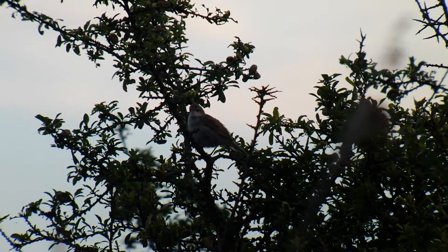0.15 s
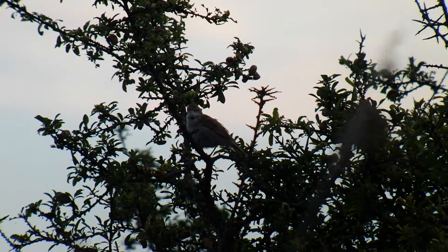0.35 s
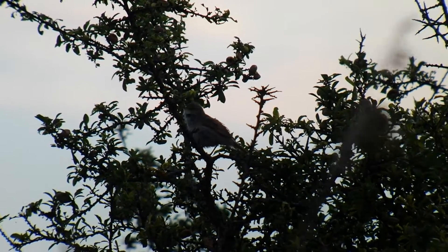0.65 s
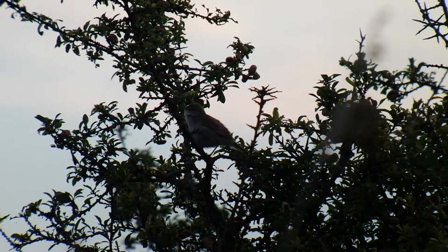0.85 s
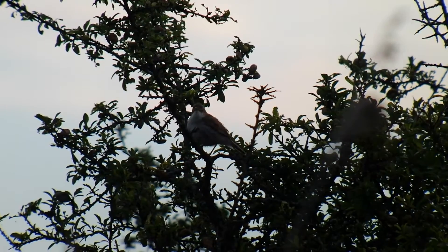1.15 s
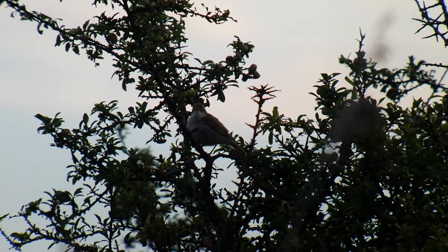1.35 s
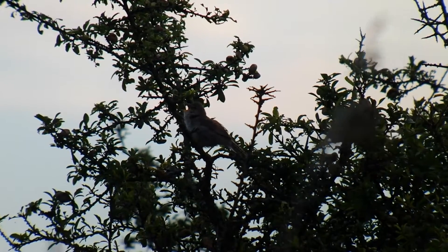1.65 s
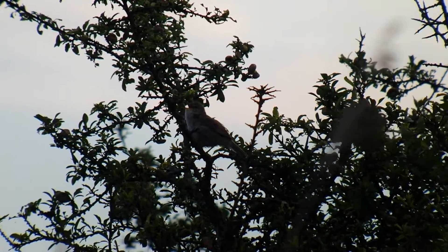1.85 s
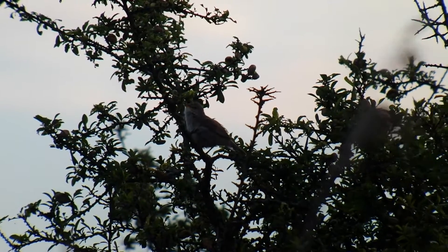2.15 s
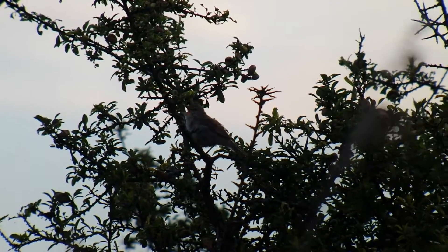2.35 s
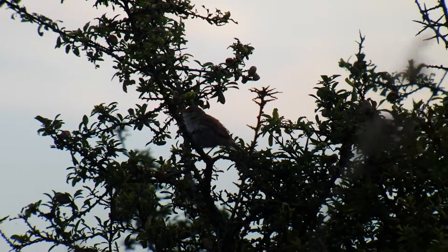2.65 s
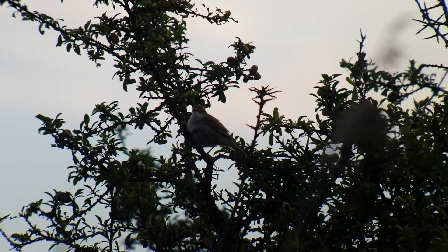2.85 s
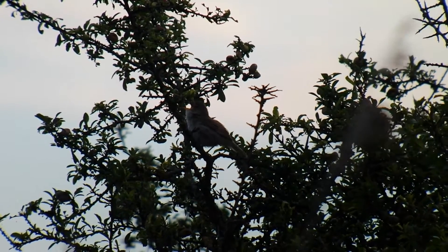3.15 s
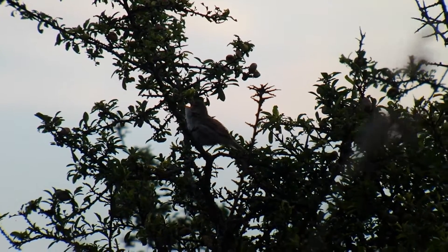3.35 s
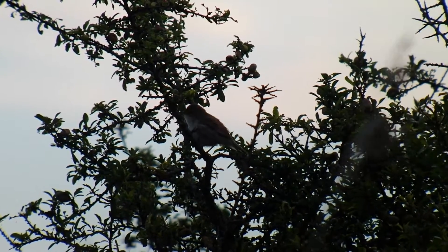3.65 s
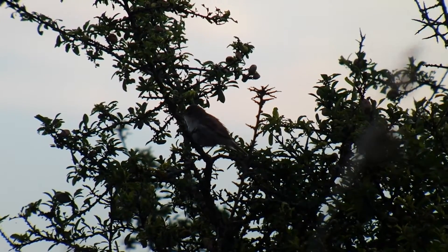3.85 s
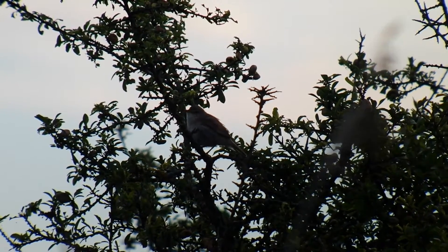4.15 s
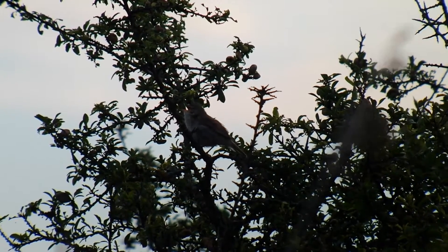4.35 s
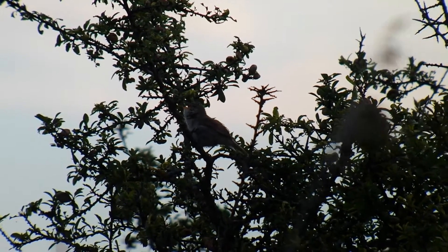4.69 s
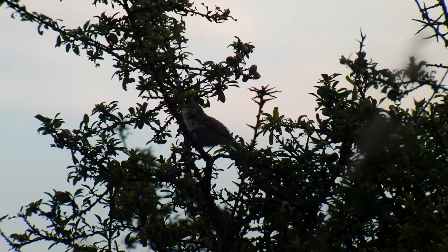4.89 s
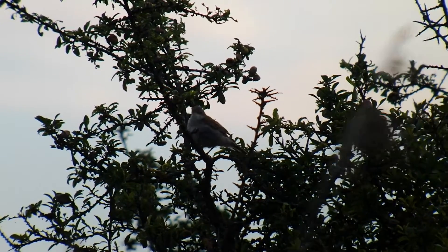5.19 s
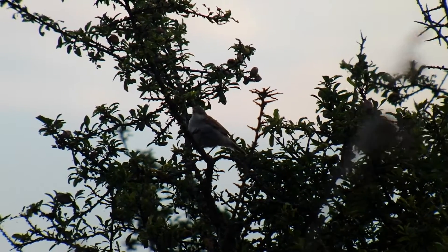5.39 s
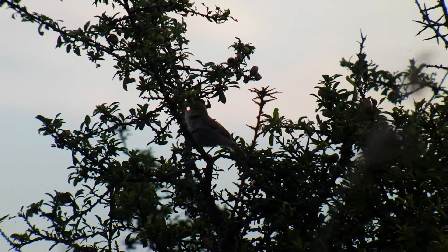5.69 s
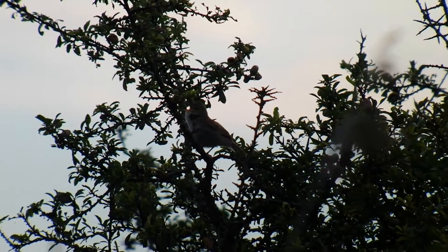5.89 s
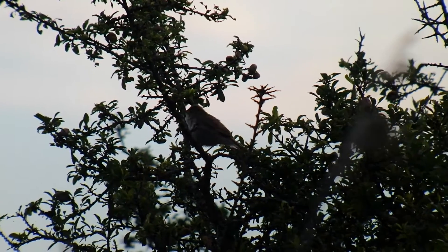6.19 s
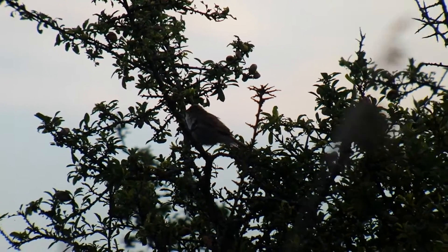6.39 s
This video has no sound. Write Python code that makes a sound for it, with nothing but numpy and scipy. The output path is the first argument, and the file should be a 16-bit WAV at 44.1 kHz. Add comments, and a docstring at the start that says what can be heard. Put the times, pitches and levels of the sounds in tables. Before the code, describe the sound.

Outdoors in a bush, a small bird slightly left sings four separated phrases of thin, clear whistles, high to lower. Other birds give hoarse distant chucks at first, quick chips, and one buzzing rattle. Low wind thumps on the right, nearly calms mid-way, then buffets both sides heavily over soft hiss.

```python
"""A small songbird, a little to the left, sings falling phrases of pure whistles: gliding sine tones
with faint overtones. Other birds chip (arched tones), trill (pulsed slides) and chuck (hoarse falling tones);
decaying noise gives them all a diffuse tail. Gusts buffet two microphone ports separately, as shaped noise
and single rolling eddies. Behind lie a low drone, treble chatter and a hiss that swells with birds and wind."""
import sys
import numpy as np
from scipy import signal
from scipy.fft import rfft, irfft, next_fast_len
from scipy.io import wavfile
from scipy.ndimage import uniform_filter1d, map_coordinates

SR = 44100
rng = np.random.default_rng(int(sys.argv[2]) if len(sys.argv) > 2 else 0)


def put_to_file(sound):
    """Save the sound as 16-bit audio at rate SR, in the file named by the first command-line argument."""
    columns = np.atleast_2d(sound).T  # one column per channel
    safe = np.clip(columns, -1, 1)
    whole_steps = np.round(safe * 32767)
    wavfile.write(sys.argv[1], SR, whole_steps.astype(np.int16))


N = 287960


def amp(db):
    """Logarithmic level: decibels to amplitude gain."""
    return 10 ** (np.asarray(db) / 20)


def unit(x):
    """Normalisation by power: each row at rms 1."""
    return x / np.sqrt(np.mean(x ** 2, axis=-1, keepdims=True) + 1e-20)


def curves(rows):
    """Linear interpolation in time: one value per sample for each column after the time."""
    s, *columns = np.transpose(rows)
    return np.array([np.interp(np.arange(N) / SR, s, column) for column in columns])


def wobble(rate):
    """Band-limited random fluctuation: a smooth curve through `rate` random knots per second."""
    knots = rng.standard_normal(int(N * rate / SR) + 4)
    return map_coordinates(knots, [np.arange(N) * rate / SR])


def filtered(x, response):
    """Linear filtering: the spectrum of x times a response of frequency."""
    m = next_fast_len(x.shape[-1] + 8192)
    spectrum = rfft(x, m) * response(np.fft.rfftfreq(m, 1 / SR))
    return irfft(spectrum, m)[..., :x.shape[-1]]


def colour(points):
    """Spectral colour: a gain interpolated between (Hz, dB) points on a log-frequency axis."""
    f, db = np.transpose(points)
    return lambda hz: amp(np.interp(np.log(hz + 1), np.log(f + 1), db))


def add(out, s, hz, level, pan_db, lead, multiple=1):
    """Phase is the integral of frequency; level and phase differences place the tone between the ports."""
    port_lead = np.array([[.5], [-.5]]) * lead
    phase = multiple * (2 * np.pi * np.cumsum(hz) / SR + port_lead)
    side = amp([[pan_db / 2], [-pan_db / 2]])
    start = round(s * SR)
    out[:, start:start + len(hz)] += 2 * side / np.linalg.norm(side) * level * np.sin(phase)


def whistles(rows, multiples, swell_db, curve, flick_hz, quaver_hz, quaver_db):
    """Frequency and amplitude modulation: a note swells, glides through a turn, fades and is cut short."""
    cut_s = 0.0055  # the closing flick of a note
    flick_from_hz, flick_full_hz = 2900, 4300  # low notes stop flat, high ones flick down fully
    out, bend_hz = np.zeros((2, N)), quaver_hz * wobble(120)
    sway_rad = 0.27 * wobble(25)  # moving air and a moving head shift the path to each port
    flutter_db = quaver_db * np.array([wobble(83), wobble(90)])
    for s, length, first_hz, turn_hz, last_hz, turn, db, fade_db, pan_db, lead, over_db, *shape in rows:
        arch_hz, peak = shape or (0, turn)  # plain calls glide straight and peak at the turn
        i = np.arange(round(s * SR), round((s + length) * SR))
        u = np.linspace(0, 1, len(i))
        cut = np.clip(1 - (1 - u) * length / cut_s, 0, 1)
        rise_db = -swell_db * np.clip(1 - u / peak, 0, 1) ** curve
        fall_db = -fade_db * np.clip((u - peak) / (1 - min(peak, .95)), 0, 1)
        under_db = rise_db + fall_db
        level = amp(db + under_db + flutter_db[:, i]) * (1 - cut ** 2) * signal.windows.tukey(len(i), .05)

        glide_hz = np.interp(u, [0, turn, 1], [first_hz, turn_hz, last_hz])
        bow_hz = arch_hz * np.sin(np.pi * np.clip(u / turn, 0, 1) ** 0.73)
        flick = flick_hz * np.interp(turn_hz, [flick_from_hz, flick_full_hz], [0, 1]) * cut ** 2
        pitch_hz = glide_hz + bow_hz - flick + bend_hz[i]
        add(out, s, pitch_hz, level, pan_db, lead + sway_rad[i])
        for k in multiples:  # soft parts and endings are the least pure; overtones beam to the right port
            over_level = level * amp(over_db - 0.6 * under_db) * (1.48 * u) ** 2
            add(out, s, pitch_hz, over_level, -6, lead, k)
    return out


def trills():
    """Pulse-train modulation: each pulse slides in pitch, rough ones scatter, the last quarter sags."""
    # buzzy trills: start_s, length_s, pitch_hz, slide_hz, pulse_rate_hz, level_db, left_right_db,
    # left_lead_rad, roughness (0-1)
    trill_rows = [(1.987, 0.031, 5500, -700, 160, -50, 10, 2, 0.11),
                  (2.075, 0.037, 6840, 500, 130, -50.5, 14, -1.8, 0.28),
                  (2.129, 0.033, 5510, -700, 172, -40.5, 8, 10.5, 0.16),
                  (2.207, 0.044, 6920, 500, 120, -51.5, 15, 8, 0.12),
                  (2.27, 0.034, 5530, -700, 174, -39, 8, 3.5, 0.18),
                  (2.377, 0.036, 4650, 300, 170, -40.5, 3, 1.5, 0.32),
                  (2.378, 0.037, 5840, 400, 203, -35, 5, 1.1, 0.44),
                  (2.411, 0.065, 4880, -400, 150, -47.5, 2, 1, 0.16),
                  (2.412, .05, 6090, -800, 135, -43.5, 7, 0.9, 0.53),
                  (2.416, 0.07, 5590, -1000, 146, -42.5, 6, 1.5, 0.3),
                  (2.553, 0.046, 5500, -500, 140, -59, 9, 4, .2),
                  (2.699, .06, 5500, -500, 150, -69, 12, 1.5, 0.38)]
    # slides up into the lower trills: start_s, level_db (at the end of the slide)
    lead_rows = [(1.972, -46), (2.113, -39.5), (2.254, -38)]
    # harsh burst that opens the rattle: start_s, length_s, level_db
    screech = (2.381, 0.016, -40)
    # broad crack at its start: length_s, level_db
    screech_crack = (.004, -56)
    out = np.zeros((2, N))
    for s, length, hz, slide_hz, rate, db, pan_db, lead, rough in trill_rows:
        t = np.arange(round(length * SR)) / SR
        cycle, pulse = t * rate % 1, (t * rate).astype(int)
        size_db, shift_hz = rng.standard_normal((2, 30))[:, pulse] * [[1 + 3 * rough], [250 * rough]]
        sag = np.clip(t / length - .75, 0, 1)
        slow_noise = unit(uniform_filter1d(rng.standard_normal(SR // 10), size=40))[:len(t)]
        rasp = (1 - rough) + rough * slow_noise
        pulses = np.sin(np.pi * cycle) ** (1 - 0.63 * rough)
        level = amp(db + size_db - 23 * sag) * rasp * pulses * signal.windows.tukey(len(t), .1)
        pitch_hz = hz + shift_hz + slide_hz * (cycle - .5) - 1200 * sag
        add(out, s, pitch_hz, level, pan_db, lead)

    u = np.linspace(0, 1, round(.017 * SR))
    for s, db in lead_rows:
        level = amp(db - 10.7 * (1.0 - u)) * signal.windows.tukey(len(u), .3)
        add(out, s, 4450 + 1100 * u ** 3, level, 8, 2.2)
    # the throat passes one band
    out = filtered(out, colour([(3200, -48), (4100, 1), (7300, 1.5), (8500, -30)]))

    s, length, db = screech
    crack_s, crack_db = screech_crack
    t = np.arange(N) / SR - s
    harsh_colour = colour([(1500, -32), (3000, -13), (5500, 0), (7500, -7), (11000, -45)])
    harsh = unit(filtered(rng.standard_normal(N), harsh_colour))
    crack_colour = colour([(1500, -30), (2500, 0), (8000, 3), (11000, -22)])
    crack = unit(filtered(rng.standard_normal(N), crack_colour))
    out = out + amp(crack_db) * crack * (t > 0) * np.exp(-abs(t) / crack_s)
    return out + amp(db + np.array([[2], [-3]])) * harsh * (t > 0) * np.exp(-(t / length) ** 2)


def chucks():
    """Noise modulation makes hoarseness: each scold is two rough voices dropping fast in pitch."""
    # a far scolding bird: start_s, level_db (of each voice at its start)
    chuck_rows = [(0.147, -65), (0.289, -63.5), (0.422, -62.5), (0.543, -63), (0.671, -60.5), (.829, -60.5)]
    out, u = np.zeros((2, N)), np.linspace(0, 1, round(0.0256 * SR))
    for s, db in chuck_rows:
        for top_hz, drop_hz in (3000, 1250), (3350, 697):
            hoarse = 1 + 1.12 * unit(uniform_filter1d(rng.standard_normal(len(u)), size=50))
            level = amp(db - 6.9 * u) * hoarse * signal.windows.tukey(len(u), .3)
            add(out, s, top_hz - drop_hz * u ** 0.606, level, 2, .3)
    return out


def echoes(x, t60):
    """Diffuse scattering by twigs, ground and far hedges: a decaying noise tail, different at each port."""
    t = np.arange(SR // 4) / SR
    tail = rng.standard_normal((2, len(t))) * amp(-60 * t / t60) * (1 - np.exp(-t / 0.0048))
    return signal.fftconvolve(x, tail / np.linalg.norm(tail[0]), axes=1)[:, :N]


def wind():
    """Turbulent pressure at each port: lumpy rumble, brighter in strong gusts, with single eddies on top."""
    # the strongest eddies: time_s, port (0 left, 1 right), peak_db, pitch_hz, length_s, edge_peak_db
    strong_eddies = [(.102, 1, -28.5, 118, .01, -57), (.203, 1, -37.5, 71.5, 0.013, -65),
                     (.374, 0, -28, 95, 0.01, -65), (.413, 1, -31, 103.7, 0.041, -60),
                     (.464, 1, -31.5, 89.5, 0.011, -62), (.572, 1, -32.5, 79.5, .016, -60),
                     (.607, 1, -25.5, 99, 0.011, -55), (.591, 0, -35.5, 83, 0.013, -65),
                     (.729, 1, -20, 154, 0.0052, -30), (.763, 1, -20.5, 117, 0.019, -46),
                     (.932, 1, -27.5, 88.5, 0.016, -60), (.865, 1, -39, 110, .012, -53),
                     (.987, 1, -29.5, 102, 0.014, -55), (1.038, 1, -4, 128, 0.0033, -23),
                     (1.524, 1, -27.5, 118, 0.0069, -60.5), (1.696, 1, -32, 103, .024, -63),
                     (1.799, 1, -24.5, 103, 0.01, -39), (1.851, 1, -23, 113, 0.018, -54),
                     (1.876, 0, -39, 70, 0.018, -65), (1.882, 1, -16, 176, 0.01, -28),
                     (1.942, 1, -18, 108, 0.0084, -53), (2.086, 1, -32, 109, 0.0084, -60),
                     (2.19, 1, -27.5, 132, 0.018, -41), (2.334, 1, -35, 87.4, .024, -60),
                     (2.402, 1, -44, 68, .017, -65), (2.488, 1, -32.5, 85, 0.016, -62),
                     (2.975, 1, -48.5, 100, .012, -65), (3.585, 1, -35, 91, 0.013, -60),
                     (3.659, 1, -36.5, 70, 0.019, -65), (3.695, 0, -32, 74.5, 0.0079, -60),
                     (3.721, 0, -35.5, 101, 0.02, -64), (3.993, 1, -16.5, 103, 0.012, -43),
                     (4.008, 1, -18.5, 112, 0.0066, -22.5), (4.012, 0, -31, 94, 0.016, -42),
                     (4.135, 1, -18, 145, 0.0086, -29.5), (4.133, 0, -25.5, 97, 0.02, -51),
                     (4.151, 1, -26, 120, 0.012, -24), (4.217, 0, -27.5, 97.4, 0.041, -41),
                     (4.27, 0, -16, 179, 0.0065, -32), (4.288, 1, -14, 108, 0.0058, -43),
                     (4.33, 0, -16.5, 148, 0.0047, -33), (4.364, 0, -25.5, 104, 0.035, -38),
                     (4.433, 0, -23, 148, 0.019, -29), (4.523, 0, -13, 125.4, 0.013, -33),
                     (4.604, 0, -16.5, 118, 0.025, -16), (4.663, 0, -25.5, 121, 0.021, -29),
                     (4.828, 0, -13.5, 111, 0.026, -31), (4.881, 1, -9, 117, .011, -35),
                     (4.963, 0, -22.5, 132, .015, -54), (4.977, 1, -23, 99, 0.0093, -50),
                     (5.057, 1, -12.5, 98, 0.021, -40), (5.072, 0, -19.5, 189, 0.0053, -28.5),
                     (5.121, 0, -18, 133, 0.0069, -44), (5.149, 0, -24, 177, 0.0095, -44),
                     (5.193, 1, -21, 74.4, 0.021, -45), (5.273, 1, -9, 126, 0.021, -11),
                     (5.335, 0, -24.5, 112, 0.0079, -49), (5.371, 1, -23.5, 120, 0.02, -31),
                     (5.413, 1, -20, 98, 0.014, -43), (5.621, 0, -20.5, 127, 0.01, -31),
                     (5.643, 1, -16.5, 121, 0.018, -31), (5.646, 0, -21, 126.7, 0.036, -40),
                     (5.808, 1, -14.5, 153, 0.0093, -27), (5.835, 1, -19, 127, 0.03, -40),
                     (5.837, 0, -20.5, 99, 0.03, -45), (5.874, 0, -16, 97.5, 0.01, -41),
                     (5.884, 1, -23, 104, .027, -45), (5.958, 0, -18, 117, 0.0085, -37),
                     (6.014, 0, -11, 138, 0.0077, -20.5), (6.029, 1, -32, 68, 0.036, -50),
                     (6.063, 0, -19, 108, 0.039, -32), (6.145, 0, -18, 143, .023, -21.5),
                     (6.18, 0, -23.5, 107, 0.031, -21.5), (6.257, 1, -23.5, 94, .013, -42),
                     (6.263, 0, -29, 121, 0.0079, -24), (6.29, 0, -15.5, 116.5, 0.024, -21.5),
                     (6.315, 0, -15, 122, 0.0083, -48), (6.34, 0, -18, 132, 0.02, -30),
                     (6.403, 0, -7.5, 149, 0.012, -9.5), (6.423, 0, -18.5, 150, 0.015, -17),
                     (6.462, 0, -17.5, 140, 0.004, -16)]
    # steady buffeting: time_s, left_db, right_db
    gust_rows = [(0, -62, -33), (.25, -61, -57), (.45, -60, -48), (.75, -63, -38.5), (1.1, -68, -41.5),
                 (1.22, -67, -74), (1.48, -92.5, -67), (1.55, -73.5, -54.5), (1.75, -65, -50),
                 (1.87, -71, -38), (2.1, -63, -48.5), (2.48, -66, -43.5), (2.58, -72, -69), (2.7, -73, -73),
                 (2.95, -78, -74), (3.3, -55.5, -66), (3.55, -58.5, -52.5), (3.7, -49, -53),
                 (3.8, -71, -83), (3.9, -54, -55), (4.0, -37.5, -34.5), (4.2, -35, -40.5),
                 (4.4, -35.5, -49), (4.62, -27, -48), (4.75, -39, -42.5), (4.9, -34.5, -28.5),
                 (5.15, -26, -33), (5.3, -34, -37), (5.5, -34, -38.5), (5.65, -28.5, -32),
                 (5.9, -34.5, -32), (6.02, -26.5, -46), (6.38, -24, -40), (6.53, -22, -55)]
    # colour of the rumble: frequency_hz, relative_db
    body_colour = [(15, -39), (30, -11), (60, 5), (110, -0.5), (170, -7), (300, -18), (500, -43.5),
                   (800, -53), (1500, -89)]
    # colour of its brighter edge: frequency_hz, relative_db
    edge_colour = [(150, -24), (280, 4), (450, -21.5), (700, -19.5), (1100, -20), (2000, -104.5)]
    gust_db = curves(gust_rows)
    lumps = amp(6.0 * np.array([wobble(22), wobble(22)]))
    body = filtered(lumps * rng.standard_normal((2, N)), colour(body_colour))
    edge = filtered(lumps ** 2 * rng.standard_normal((2, N)), colour(edge_colour))
    body *= amp(gust_db) / np.sqrt(uniform_filter1d(body ** 2, size=9000, axis=1) + 1e-20)
    edge_gain_db = gust_db - 23.5 + 0.66 * (gust_db + 13.0)  # grows faster than the rumble
    out = body + amp(edge_gain_db) * unit(edge)

    eddies = np.vstack([strong_eddies, lesser_eddies(gust_db, count=80)])
    chances = rng.random((len(eddies), 4))
    for (s, port, db, hz, length, edge_db), (turn, skew, kink, width) in zip(eddies, chances):
        first, end = max(round((s - 2 * length) * SR), 0), min(round((s + 2 * length) * SR), N)
        i = np.arange(first, end)
        t = i / SR - s
        phase = 2 * np.pi * (hz * t * (1 - 0.3 * t / length) + turn)  # the eddy slows as it rolls off
        swell = amp(db) * np.exp(-2.8 * (t / length) ** 2)
        roll = swell * np.sin(phase + 0.42 * np.sin(phase + 6 * skew))
        tear_s = 0.00056 + 0.0008 * width
        tear = amp(edge_db) * np.sin(2 * np.pi * (300 * t + kink)) / np.cosh(t / tear_s)
        out[round(port), i] += roll + tear
    return out * np.clip((N - np.arange(N)) / (0.036 * SR), 0, 1)  # a short fade closes the wind at the end


def lesser_eddies(gust_db, count):
    """Random turbulence: chance eddies sized by the buffeting at their port, with the strong eddies' columns."""
    over_gust_db, scatter_db, edge_under_db = 5, 4, -24
    typical_hz, typical_s = 95, .015
    faster = 0.018  # stronger eddies turn faster: log pitch per dB
    s, port = rng.random((count, 2)).T * [[N / SR], [2]]
    size, pitch, span = rng.standard_normal((count, 3)).T
    db = gust_db[port.astype(int), (s * SR).astype(int)] + over_gust_db + scatter_db * size
    hz = typical_hz * np.exp(.25 * pitch + faster * (db + 29.5))
    length = typical_s * np.exp(0.22 * span)
    return np.transpose([s, port // 1, db, hz, length, db + edge_under_db])


def hiss(birds, gusts):
    """Level-following gain on noise unrelated at the ports; far treble chatter and a shared drone are added."""
    # colour of the hiss at each port: frequency_hz, gain_db
    left_colour = [(20, 5), (40, 22), (150, 20.5), (400, 17.5), (800, 11), (1500, 9.5), (3000, 11.5),
                   (4500, 14), (5400, 10), (6100, 17), (7000, 12.5), (8200, 7), (10000, 4.5), (15500, 4.5)]
    right_colour = [(20, 2), (40, 22), (150, 19.5), (400, 16.5), (800, 12), (1500, 10), (3000, 11),
                    (4800, 11.5), (6000, 8), (8500, 11), (9800, 8), (11000, 5), (15500, 5)]
    # a far low drone: time_s, level_db
    drone_rows = [(1.7, -94), (2.0, -66), (2.45, -59.5), (2.7, -72), (2.95, -91)]
    # far treble chatter, before its trim and port offsets: time_s, level_db
    chatter_rows = [(0.0, -66.5), (0.31, -68), (0.91, -63), (1.33, -74.5), (2.27, -62), (2.69, -73),
                    (3.51, -63.5), (3.93, -73.5), (4.38, -63), (6.53, -62)]
    chatter_trim_db = -0.5
    open_gain_db, follow_db_per_db = -65, 0.34  # gain before colour at full opening; its slope below that
    open_at_db, memory_s, glide_s = -29, 0.017, 0.11  # loudness for full opening; memory; averaging time
    bird_weight_db = 0.3  # extra weight of birds in the loudness

    noise = np.array([filtered(rng.standard_normal(N), colour(port)) for port in (left_colour, right_colour)])
    drone_colour = colour([(200, -43), (250, -3.5), (300, -3), (360, -9), (500, -26.0)])
    drone = unit(filtered(rng.standard_normal(N), drone_colour))
    chatter_colour = colour([(3500, -28), (4800, -4), (6000, -4), (7200, -7), (9000, -30)])
    chatter = unit(filtered(rng.standard_normal((2, N)), chatter_colour))

    power = np.sum((amp(bird_weight_db) * birds + gusts) ** 2, axis=0)
    k = 1 / (memory_s * SR)
    smooth_power = signal.lfilter([k], [1, k - 1], power, zi=[power[:2000].mean()])[0]
    loud_db = 10 * np.log10(smooth_power + 3e-7)
    short_db = uniform_filter1d(np.minimum(loud_db - open_at_db, 0), round(glide_s * SR))
    gain_db = open_gain_db + follow_db_per_db * short_db + 0.42 * wobble(18.0)
    chatter_db = curves(chatter_rows) + chatter_trim_db + [[2], [-2]]
    return amp(gain_db) * noise + amp(curves(drone_rows)) * drone + amp(chatter_db) * chatter


def scene():
    """Superposition: near and far birds with their echoes, wind and hiss."""
    # whistles of the song: start_s, length_s, first_hz, turn_hz, last_hz, turn (share of length), peak_db,
    # fade_db (by the end), left_right_db, left_lead_rad, overtone_db (relative to the note, before it grows
    # along the note), bow_hz (before the turn), peak (share of length)
    song = [(1.485, 0.09, 5325, 5442, 5477, 0.4, -41.7, 0, 16.0, 0.2, -46.0, 204, 0.45),
            (1.615, 0.12, 4180, 4290, 4400, 0.6, -37.5, 6.0, 5.1, 0.6, -40.0, -20, 0.57),
            (1.765, 0.103, 4058, 4181, 4085, 0.76, -32.7, 0.0, 7.9, 0.5, -44.0, 55, 0.45),
            (1.92, 0.026, 3638, 3552, 3564, 0.58, -41, 6, 3.3, 2.8, -42.0, -4, 0.65),
            (1.948, 0.045, 3600, 3680, 3815, 0.46, -35, 2, 5.2, 2.8, -42.0, 0, 0.8),
            (2.022, 0.064, 3346, 3377, 3366, 0.44, -35.3, 6.0, -0.2, -0.2, -42.0, 147, 0.77),
            (2.112, 0.066, 3243, 3153, 3226, 0.5, -35.5, 7.0, 4.0, 0.1, -42.0, 113, 0.75),
            (2.995, 0.088, 5207, 5233, 5178, 0.62, -38, 8, 1.2, -3.1, -48.0, -12, 0.55),
            (3.086, 0.05, 5260, 5230, 5240, 0.3, -38, 22, 2.4, -2.8, -48.0, 0, 0.2),
            (3.145, 0.117, 4150, 4105, 4370, 0.78, -37.9, 3.0, 10.1, 2.0, -44.0, 120, 0.63),
            (3.303, 0.097, 3831, 3906, 4020, 0.64, -39.0, 3.0, 8.9, 1.4, -42.0, 47, 0.67),
            (3.44, 0.143, 3500, 3150, 1900, 0.34, -45.1, 23.0, 2.6, 0.3, -20.0, 60, 0.31),
            (4.257, 0.117, 5240, 5268, 5334, 0.82, -28.2, 7.0, 3.2, -2.5, -40.0, 149, 0.65),
            (4.42, 0.104, 4228, 4170, 4265, 0.38, -28.5, 10.0, 5.8, 1.2, -36.0, 80, 0.57),
            (4.558, 0.1, 4054, 4036, 4153, 0.74, -25.4, 5.0, 9.2, 0.8, -44.0, 114, 0.57),
            (4.695, 0.069, 3563, 3535, 3318, 0.6, -29.0, 0.0, -3.4, -0.0, -27.0, 3, 0.79),
            (4.795, 0.059, 3431, 3318, 3303, 0.42, -29.0, 0, 2.2, -0.2, -38.0, 37, 0.55),
            (4.895, 0.066, 3360, 3096, 2827, 0.76, -32.7, 15.0, 6.5, -0.1, -23.0, -59, 0.63),
            (5.578, 0.1, 5402, 5316, 5402, 0.7, -30.3, 0.0, 4.4, 2.9, -46.0, -15, 0.49),
            (5.715, 0.117, 4240, 4180, 4440, 0.6, -32.0, 1.0, 4.0, 0.8, -34.0, 110, 0.53),
            (5.865, 0.123, 3860, 4060, 4250, 0.73, -26.0, 10.0, 7.1, 0.7, -42.0, 150, 0.69),
            (6.03, 0.134, 3400, 3280, 1860, 0.34, -30.5, 29.0, 3.5, 0.1, -38.0, 0, 0.35)]
    # arched calls of passing birds, often after a small lead-in arch: the first eleven columns of song
    chips = [(.825, .018, 5170, 4800, 4040, .6, -55, 5, -1.9, -0.5, -32),
             (.844, .028, 4150, 5400, 5500, 0.89, -40, 0, 4, -2.5, -31),
             (.87, 0.018, 5480, 6500, 4320, 0.44, -32, 24, 4.5, -2.5, -33),
             (2.338, 0.025, 4060, 5340, 5190, .55, -49.5, 6, 4, 5, -45),
             (2.363, .019, 5150, 6500, 6300, 0.76, -36, 10, 5, 4.5, -45),
             (3.65, .016, 5000, 4900, 4070, .2, -59, 1, 1, 5, -30),
             (3.672, 0.014, 4380, 5460, 4900, 0.65, -46, 2, 4, 3, -14.5),
             (3.684, .023, 4980, 6220, 4800, 0.7, -34.5, 14, 5.5, 2, -28),
             (4.435, 0.015, 4710, 5230, 4710, 0.38, -47, 8, -.4, 4, -12),
             (4.462, 0.019, 5100, 5700, 5600, .65, -36.5, 7, 1.4, 1.5, -20),
             (4.481, .014, 5700, 6100, 5000, .45, -31.5, 20, 1.4, 1.5, -24.5),
             (5.823, 0.019, 6030, 5250, 4500, .35, -55, 3, -3, 0, -23.5),
             (5.837, 0.026, 4600, 5300, 5560, .45, -44.5, 0, -1, 2.2, -20),
             (5.863, .018, 5600, 6180, 4770, 0.35, -31, 23, 2, 1.8, -21),
             (5.95, 0.029, 4730, 5430, 5250, .75, -43, 3, -3, 1.5, -21)]
    # far whistles: the first eleven columns of song, overtone_db unused
    faint = [(0, .03, 2770, 2730, 2690, .3, -65, 1, -2, .3, 0),
             (.565, .067, 2410, 2720, 2700, .5, -70, 4, -2.5, -.6, 0),
             (1.02, .04, 3300, 3150, 3050, .5, -72, 2, 0, .5, 0),
             (1.09, .06, 3900, 4300, 4100, .4, -72, 3, 0, .5, 0),
             (1.49, .095, 4700, 4540, 4430, .7, -71, 6, -5, .6, 0),
             (1.57, .03, 3850, 4250, 4300, .7, -68, 2, 4, .5, 0),
             (2.478, .065, 4400, 4100, 3850, .4, -65, 5, -6, 1, 0),
             (2.49, .07, 4650, 4400, 4150, .4, -69, 5, -6, 1, 0)]
    near = whistles(song, [2], swell_db=25, curve=1.9, flick_hz=380, quaver_hz=12, quaver_db=.7)
    near += whistles(chips, [3 / 2, 2], swell_db=14, curve=0.93, flick_hz=0, quaver_hz=25, quaver_db=.8)
    near += trills()
    far = chucks()
    far += whistles(faint, [], swell_db=-1, curve=1, flick_hz=0, quaver_hz=70.4, quaver_db=1.5)
    near_tail = amp(-18.5) * echoes(near, t60=0.15)
    far_tail = amp(-3.5) * echoes(far, t60=0.203)
    birds, gusts = near + far + near_tail + far_tail, wind()
    return birds + gusts + hiss(birds, gusts)


def record(dry):
    """Band limiting: nothing passes above the top frequency."""
    top_hz = 15550
    return filtered(dry, lambda hz: hz < top_hz)


dry = scene()
out = record(dry)
put_to_file(out)
```